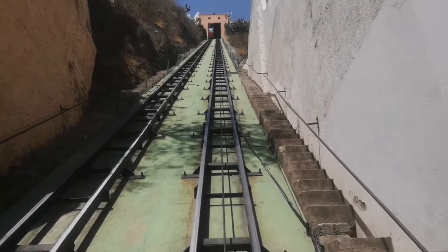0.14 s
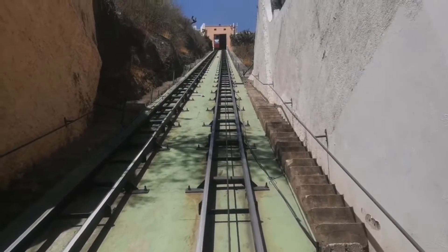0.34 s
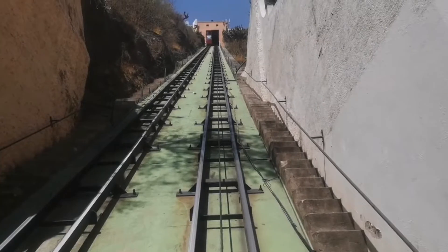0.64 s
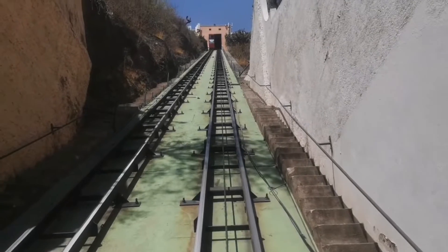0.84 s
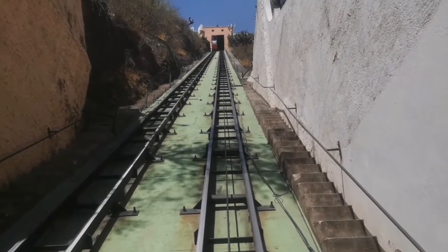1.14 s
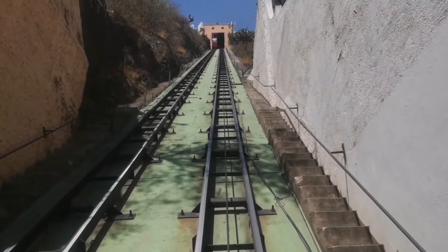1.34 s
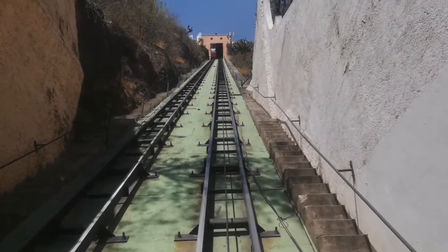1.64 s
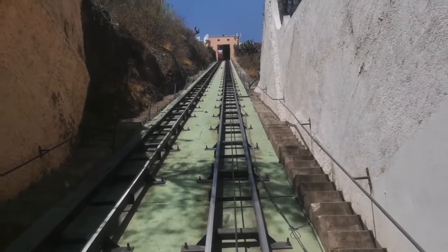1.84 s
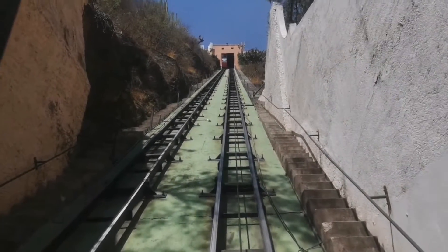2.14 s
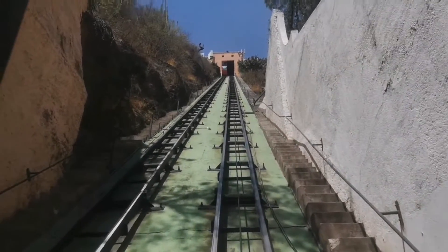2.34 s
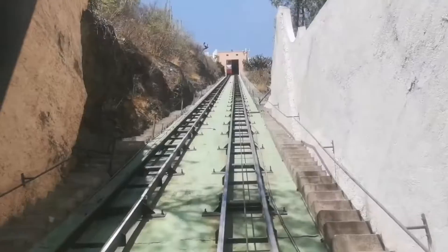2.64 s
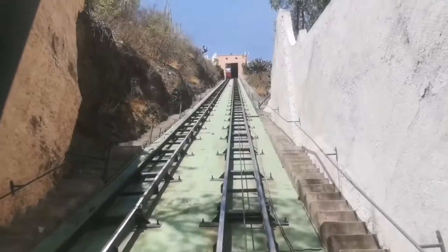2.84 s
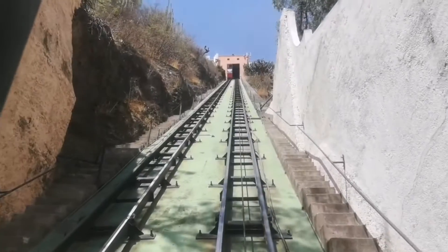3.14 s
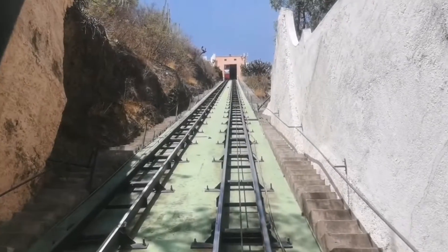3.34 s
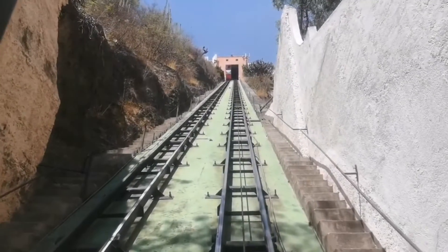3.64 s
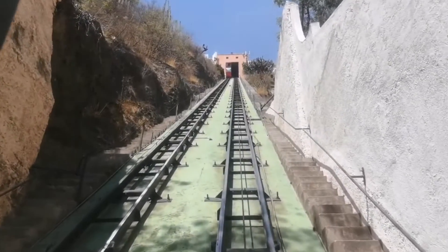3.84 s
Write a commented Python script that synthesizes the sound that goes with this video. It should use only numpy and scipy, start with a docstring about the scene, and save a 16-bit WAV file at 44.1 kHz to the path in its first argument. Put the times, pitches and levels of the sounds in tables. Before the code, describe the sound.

A funicular cabin rumbles and booms deeply as it climbs, with loose metal fittings clattering in bursts

```python
"""The body of a funicular cabin booms and rumbles, heard from inside as it climbs: noise through resonances.
Under it the wheels roar on the rails, as patchy wide noise. Loose metal fittings, nearer the left of
two spaced microphones, clatter in listed hits: bursts of bounces drive a tick, a clank and a knock.
Late on, a thin metal part twice trembles on, as a narrow band of noise that dies away."""
import sys
import numpy as np
from scipy import signal
from scipy.fft import rfft, irfft
from scipy.io import wavfile
from scipy.ndimage import uniform_filter1d

SR = 44100
rng = np.random.default_rng(int(sys.argv[2]) if len(sys.argv) > 2 else 0)


def to_wav(s):
    """Save 16-bit WAV."""
    ch = np.atleast_2d(s).T  # columns
    pcm = np.round(np.clip(ch, -1, 1) * 32767)  # PCM
    wavfile.write(sys.argv[1], SR, pcm.astype(np.int16))


def voltage_ratio(level):
    """Linear amplitude factor for a level in decibels (scalar or array-like)."""
    return 10 ** (np.asarray(level, float) / 20)


N = 176400  # 4 s

# wheel roar over time: time_s, level_db
ROLL_LEVEL = [(0, -41), (.3, -27), (.65, -38), (1.4, -33), (1.85, -39), (2.5, -37), (2.8, -34),
              (3.3, -36.5), (3.7, -35.5), (4, -35.5)]
# colour of the roar, relative: pitch_hz, density_db_per_hz
ROAR_COLOUR = [(180, -15.5), (300, -13.5), (506, -14.5), (690, -18.5), (896, -14.5), (1330, -22.5),
               (2060, -20), (2900, -35.5), (6460, -50.5), (11100, -58.5), (14800, -82)]
# likeness of the roar at the two microphones: pitch_hz, correlation (-1 to 1)
ROAR_LIKENESS = [(250, 0.28), (600, -0.28), (1400, 0.21)]
# nudges of the thin part: start_s, level_db, t60_s
THIN_NUDGES = [(3.552, -33, 0.77), (3.797, -34, 0.7)]
# resonances of the thin part, relative: pitch_hz, width_hz, level_db
THIN_MODES = [(1834, 110, -6), (2096, 180, 0), (2860, 220, -15)]
# hits of the fittings: start_s, hit_db, clank_db and knock_db (both relative to hit_db), chatter_t60_s;
# clatter() trims the balance of tick, clank and knock
FITTING_HITS = [(0.0478, -49, 18, 22.5, 0.81), (0.0836, -30, 4, 9.5, 0.2), (0.1285, -32.5, 8.5, 13.5, 0.19),
                (0.1965, -31, -18, -14, 0.039), (0.2406, -24.5, 7, -1, 0.038),
                (0.2585, -18, -0.5, 6, 0.082), (0.2866, -44, 19.5, -14, 0.13),
                (0.3962, -33.5, 7, -19, 0.15), (0.4194, -31.5, -33, 6.5, 0.11),
                (0.4965, -35.5, 9, -3, 0.13), (0.5582, -35, -1, -4, 0.23), (0.6694, -34.5, -20, -18, 0.031),
                (0.697, -37, -6, -4, 0.095), (0.7447, -35.5, -23, 14.5, 0.1),
                (0.8298, -34, -4.5, 10.5, 0.069), (0.9561, -40, 13.5, 16.5, 0.19),
                (1.0295, -42, 12.5, 6, 0.041), (1.1239, -37.5, 6.5, 8.5, 0.12),
                (1.1842, -36, -11, 16.5, 0.14), (1.2054, -39, 11.5, -11, 0.043),
                (1.253, -40.5, 5, 11.5, 0.066), (1.3, -39.5, -0.5, -8, 0.069), (1.3365, -48, 16, 6, 0.34),
                (1.4177, -39, 7.5, 8, 0.063), (1.505, -43.5, 14.5, 22.5, 0.32),
                (1.5438, -31.5, 5.5, 7, 0.11), (1.5824, -46.5, 16, 23, 0.15), (1.6359, -44, 14, 4.5, 0.15),
                (1.8614, -48, 1, -7, 0.18), (2.4519, -47.5, -5, 5, 0.069), (2.6359, -41.5, 10, 15.5, 0.81),
                (2.7082, -21, 7, -9, 0.029), (2.7378, -26, -3, 6, 0.047), (2.7495, -26, 5, -11, 0.081),
                (2.7665, -20, 4, -3.5, 0.084), (2.8, -18.5, 4, -3, 0.045), (2.8613, -30.5, 5.5, 9, 0.079),
                (2.934, -30, 2, -3, 0.1), (2.9464, -24.5, 6.5, 1.5, 0.039), (2.9594, -30.5, 13, 14, 0.058),
                (3.036, -34, 11, -7, 0.03), (3.0844, -36.5, -12, -11, 0.051), (3.1203, -30.5, 2, -4, 0.024),
                (3.135, -21, 0.5, 0.5, 0.023), (3.2111, -51.5, 20, -1, 0.026), (3.291, -44, 4.5, -6, 0.45),
                (3.3545, -37.5, 8, -7, 0.025), (3.555, -42.5, 0, -4, 0.13), (3.6205, -28.5, -47, -30, 0.13),
                (3.7965, -32, 3, 7, 0.15)]
# colour of the tick, relative: pitch_hz, density_db_per_hz
TICK_COLOUR = [(1200, -3), (3000, -7.5), (5000, 1.5), (6300, -2), (8000, -1.5), (10200, -8.5), (14800, -23)]
# strength of the clank and knock modes, relative: pitch_hz, level_db
CLANK_MODES = [(1400, -5), (1950, 3), (2450, -2), (3000, -5.5), (5200, -21)]
KNOCK_MODES = [(150, 5), (450, 3), (1000, -2), (1700, -9)]
# decay of the cabin's reflections: pitch_hz, t60_s
CABIN_DECAY = [(300, 0.18), (2000, 0.14), (12000, 0.058)]
# lean of the fittings, added left and taken off right: pitch_hz, lean_db
LEFT_LEAN = [(700, -1), (2500, 2), (8000, 2.5), (12000, -1)]
# how hard the track shakes the cabin: time_s, heave_db, floor_panel_db, frame_db (before its lumps)
SHAKE_LEVEL = [(0, -48, -13.5, -38), (.09, -10, -20.5, -26), (.4, -16, -17.5, -24), (.62, -14.5, -23, -30),
               (.85, -19, -21, -25), (.98, -9.5, -19.5, -22.5), (1.15, -11, -20, -23.5),
               (1.4, -13, -24, -22), (1.54, -16.5, -9.5, -24.5), (1.66, -5.5, -35.5, -23.5),
               (1.9, -16, -20.5, -25), (2.22, -17, -24, -26), (2.38, -26.5, -33.5, -28),
               (2.6, -27, -21.5, -24.5), (2.72, -8.5, -26, -25.5), (2.95, -13, -10, -26.5),
               (3.35, -11, -20, -25), (3.6, -22.5, -29.5, -26.5), (4, -23, -27, -25.5)]
# resonances of heave, floor panel and frame, relative: pitch_hz, width_hz, level_db
HEAVE_MODES = [(24.8, 48, -7.5), (41.6, 10, -4.5), (49.6, 6.7, -4.5)]
PANEL_MODES = [(69.8, 13.7, -8), (76.66, 7.1, 0), (93, 19, -6.5)]
FRAME_MODES = [(126, 43, 2.5), (182.3, 53, -1.5), (247, 57, -6), (302.8, 38.4, -7.5), (343, 58, -15)]

APART = 0.7  # how differently a loose fitting radiates to the two sides, 0-1


def evened(x):
    """Scales to rms 1."""
    return x / np.sqrt(np.mean(x ** 2) + 1e-20)


def loudest(x):
    """Scales so that the loudest 5 ms have rms 1."""
    return x / np.sqrt(uniform_filter1d(x ** 2, size=220).max())


def read(points, hz):
    """Reads a table on a log-frequency axis."""
    f, value = np.transpose(points)
    return np.interp(np.log(hz + 1), np.log(f + 1), value)


def gain_curve(table, column):
    """One dB column of a table over time as gain per sample."""
    table = np.array(table)
    return voltage_ratio(np.interp(np.arange(N) / SR, table[:, 0], table[:, column]))


def add(mix, start_s, sound):
    """Mixes a two-channel sound in at a time."""
    part = mix[:, round(start_s * SR):][:, :sound.shape[1]]
    part += sound[:, :part.shape[1]]


def resonant_noise(modes, same, steady):
    """Noise through resonances; same is the left-right correlation, steady evens out the swings."""
    hz = np.fft.rfftfreq(N, 1 / SR)
    # each width is taken 6 dB below the peak
    power = sum(voltage_ratio(db) ** 2 / (1 + (2 * (hz - f) / width) ** 2) ** 2 for f, width, db in modes)
    middle, side = irfft(rfft(rng.standard_normal((2, N))) * np.sqrt(power), N)
    swing = uniform_filter1d(abs(signal.hilbert(middle)), SR // 40)
    middle = middle / (swing + 0.093 * swing.mean()) ** steady
    side_gain = np.sqrt((1 - same) / (1 + same))
    return evened(evened(middle) + side_gain * evened(side) * np.array([[1], [-1]]))


def roar():
    """Steel wheels on rail: patchy wide noise with humps where the rail resonates."""
    patchy_db, flicker_db = 2.5, 0.8  # rms
    frames, hz = N // 128 + 5, np.fft.rfftfreq(512, 1 / SR)
    a, b, c, d, patches = rng.standard_normal((frames, 257, 5)).T
    # the flicker moves all pitches together, the patches are local in pitch and time
    flicker = evened(uniform_filter1d(patches[0], size=6))
    patches = uniform_filter1d(patches, size=5, axis=0)
    patches = evened(uniform_filter1d(patches, size=24, axis=1))
    same = read(ROAR_LIKENESS, hz)[:, None]
    left = a + 1j * b
    right = same * left + np.sqrt(1 - same ** 2) * (c + 1j * d)
    colour_db = read(ROAR_COLOUR, hz)[:, None] + patchy_db * patches + flicker_db * flicker
    spectra = np.array([left, right]) * voltage_ratio(colour_db)
    wide = evened(signal.istft(spectra, nperseg=512, noverlap=384)[1][:, :N])
    return gain_curve(ROLL_LEVEL, 1) * wide


def thin_part():
    """A thin metal part trembles on after it is nudged: narrow noise with exponential decay."""
    t, envelope = np.arange(N) / SR, np.zeros(N)
    for start_s, db, t60 in THIN_NUDGES:
        rise = np.clip((t - start_s) / 0.0032, 0, 1)
        envelope += rise * voltage_ratio(db - 60 * np.maximum(t - start_s, 0) / t60)
    return envelope * resonant_noise(THIN_MODES, same=0.56, steady=0.13)


def ring(strength, t60, chance):
    """One blow on a loose part: many short modes, low ones longer, each reaching the sides in its own phase."""
    t, low_hz, top_hz = np.arange(3000) / SR, strength[0][0], strength[-1][0]
    count = len(chance[0])
    place = (np.arange(count) + chance[0]) / count
    hz = (low_hz * (top_hz / low_hz) ** place)[:, None]
    # from t60 at the lowest mode to half of it an octave up, each mode varied at random
    mode_t60 = t60 * (.5 + chance[1, :, None]) * np.maximum(2 * low_hz / hz, 1) / 2
    fall = voltage_ratio(read(strength, hz) - 60 * t / mode_t60)
    turns = np.array([chance[2], chance[2] + APART * chance[3]])[..., None]
    rise = 1 - np.exp(-(t / 0.00015) ** 2)
    return (fall * np.sin(2 * np.pi * (hz * t + turns))).sum(1) * rise


def clatter():
    """Each hit is a crack and a dying chatter of bounces that drive tick, clank and knock."""
    bounces_per_s, spread_db = 2200, 2.2
    tick_trim_db, clank_trim_db, knock_trim_db = -8, 3, 0.5
    settle_db, settle_t60_s = -12.5, 0.35  # faint chatter that goes on after a hit
    clank_t60_s, knock_t60_s, rise_s, tick_fall_s = 0.015, 0.038, 0.00061, 0.0019
    places, size = np.zeros((3, 2, N)), 8192
    t, hz = np.arange(size) / SR, np.fft.rfftfreq(size, 1 / SR)
    colour = voltage_ratio(read(TICK_COLOUR, hz) - 60 * (hz < 1000))
    for k, (start_s, db, clank_db, knock_db, t60) in enumerate(FITTING_HITS):
        noise, dice = rng.standard_normal((2, size)), rng.random(size)
        sizes, chance = rng.exponential(1, size), rng.random((2, 4, 32))
        fade = voltage_ratio(-60 * t / t60) + voltage_ratio(settle_db - 60 * t / settle_t60_s)
        fade = fade * (1 - np.exp(-t / rise_s))
        bounces = (dice < bounces_per_s / SR) * voltage_ratio(spread_db * (np.minimum(sizes, 3) - 4)) * fade
        crack = 2 * (t == 0)
        bounces = (bounces * np.sign(noise[0]) + crack)[None]
        sides = np.array([noise[0], np.sqrt(1 - APART) * noise[0] + np.sqrt(APART) * noise[1]])
        hiss = irfft(rfft(sides) * colour, size)
        gate = signal.lfilter([1], [1, -np.exp(-1 / (tick_fall_s * SR))], abs(bounces))
        clank_ring = ring(CLANK_MODES, clank_t60_s, chance[0])
        knock_ring = ring(KNOCK_MODES, knock_t60_s, chance[1])
        clank = signal.fftconvolve(bounces, clank_ring, axes=1)[:, :size]
        knock = signal.fftconvolve(bounces, knock_ring, axes=1)[:, :size]
        hit = voltage_ratio(tick_trim_db) * loudest(hiss * gate)
        hit += voltage_ratio(clank_trim_db + clank_db) * loudest(clank)
        hit += voltage_ratio(knock_trim_db + knock_db) * loudest(knock)
        add(places[k % 3], start_s, voltage_ratio(db) * hit)  # the hits take turns among three places
    return places


def cabin():
    """Spectrum of direct sound plus dense reflections, each band dying at its own speed; none is favoured."""
    right_lag_s, reflections_db = 0.00057, -5  # reflections against direct sound, before the flattening
    size = SR // 2
    taps = rng.choice([-1., 1.], (2, size)) * (rng.random((2, size)) < .15) * (np.arange(size) > 60)
    hz, t, bands = signal.stft(taps, SR, nperseg=256)
    bands = bands * voltage_ratio(-60 * t / read(CABIN_DECAY, hz)[:, None])
    tail = signal.istft(bands, SR, nperseg=256)[1][:, :size]
    tail = voltage_ratio(reflections_db) * tail / np.linalg.norm(tail[0])
    direct = np.arange(size) == np.array([[0], [round(right_lag_s * SR)]])
    response = rfft(tail + direct, 2 * N)
    return response / np.sqrt(uniform_filter1d(abs(response) ** 2, size=1600, axis=1))


def fittings():
    """Clatter in three places of the cabin, nearer the left microphone: right lags, tone leans by side."""
    lean = voltage_ratio(read(LEFT_LEAN, np.fft.rfftfreq(2 * N, 1 / SR)))
    metal = sum(rfft(place, 2 * N) * cabin() for place in clatter())
    return irfft(metal * np.array([lean, 1 / lean]), 2 * N)[:, :N]


def rumble():
    """The cabin heaves on its wheels; floor panel and frame ring along, the frame in lumps."""
    slow = uniform_filter1d(rng.standard_normal(N), size=3000)
    lumps = voltage_ratio(1.78 * evened(uniform_filter1d(slow, size=3000)))  # 1.78 dB rms
    heave = gain_curve(SHAKE_LEVEL, 1) * resonant_noise(HEAVE_MODES, same=.9995, steady=0.15)
    panel = gain_curve(SHAKE_LEVEL, 2) * resonant_noise(PANEL_MODES, same=1.0, steady=0.33)
    frame = gain_curve(SHAKE_LEVEL, 3) * lumps * resonant_noise(FRAME_MODES, same=0.94, steady=0.066)
    return heave + panel + frame


def scene():
    """Inside the cabin: roar and rumble all round, the thin part and the fittings among them."""
    return roar() + thin_part() + fittings() + rumble()


def roll_off(x):
    """The treble ends steeply here."""
    return signal.sosfilt(signal.butter(12, 15000, fs=SR, output="sos"), x)


def record(dry):
    """Soft overload of the microphones' input stage."""
    mix = np.tanh(dry)
    return roll_off(mix)


dry = scene()
out = record(dry)
to_wav(out)
```